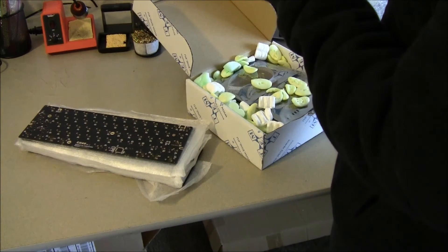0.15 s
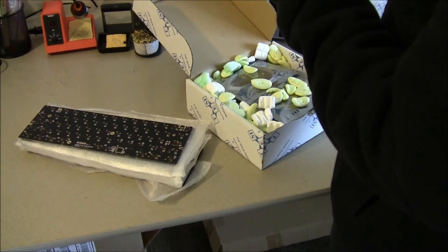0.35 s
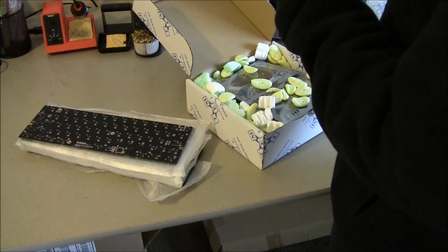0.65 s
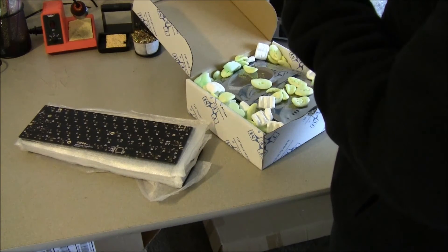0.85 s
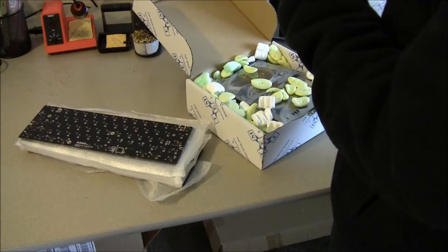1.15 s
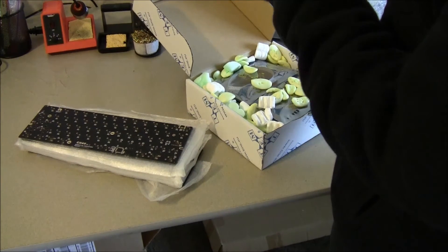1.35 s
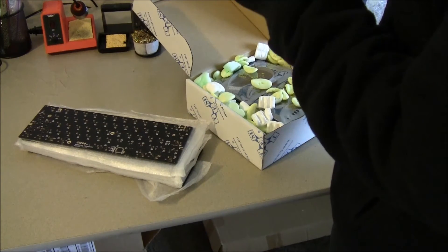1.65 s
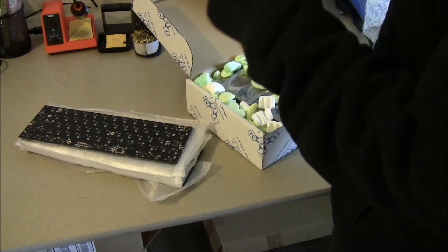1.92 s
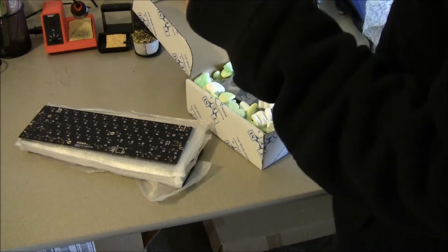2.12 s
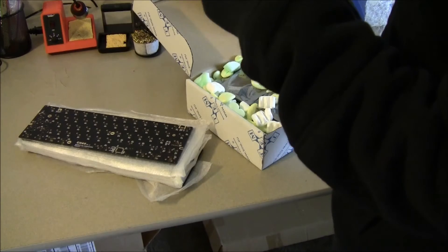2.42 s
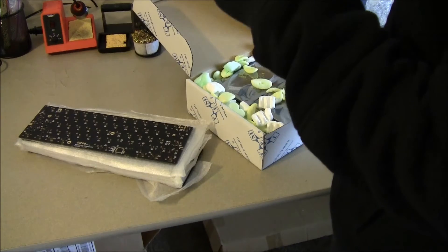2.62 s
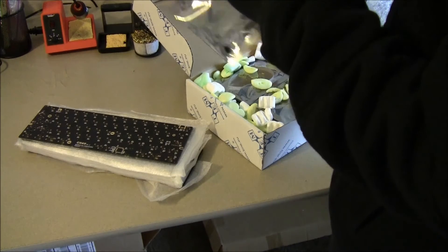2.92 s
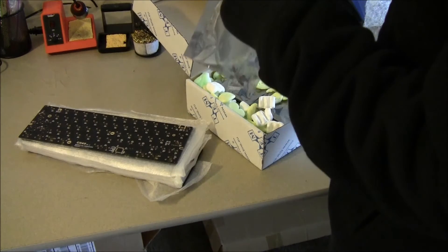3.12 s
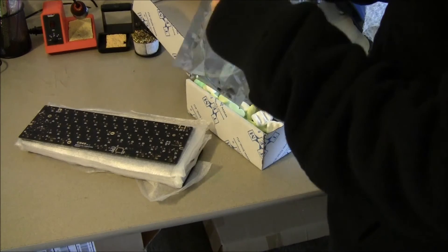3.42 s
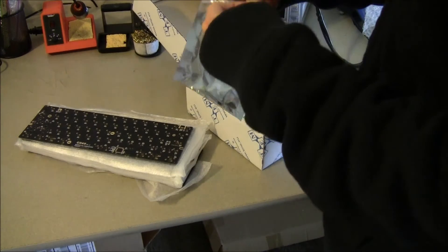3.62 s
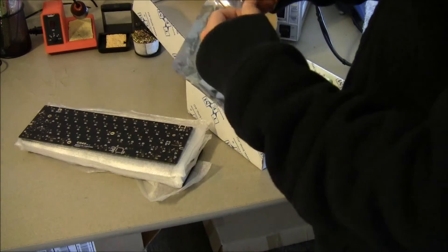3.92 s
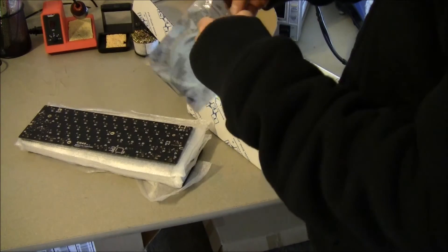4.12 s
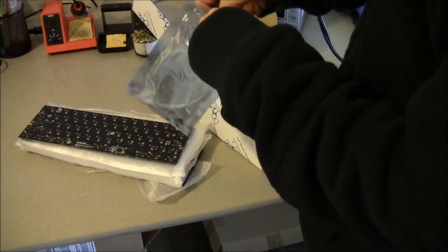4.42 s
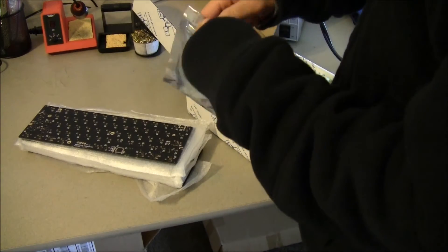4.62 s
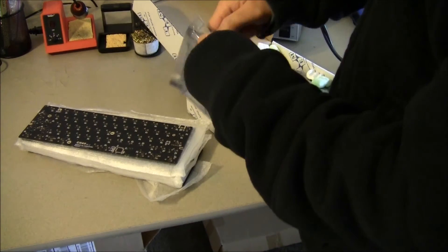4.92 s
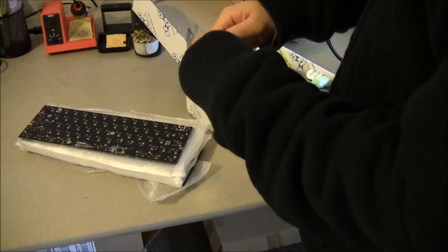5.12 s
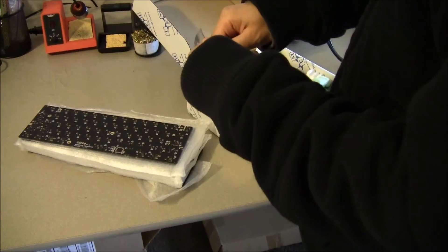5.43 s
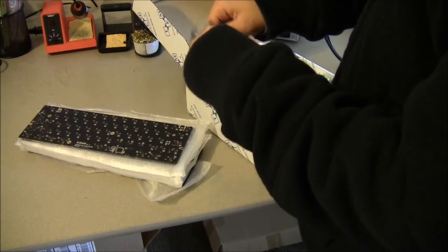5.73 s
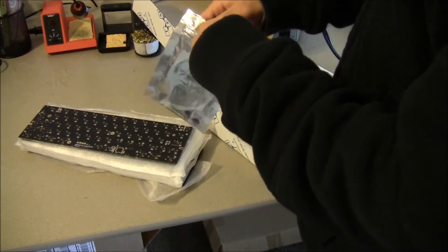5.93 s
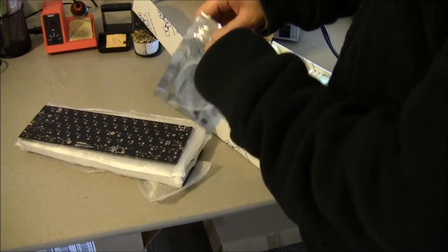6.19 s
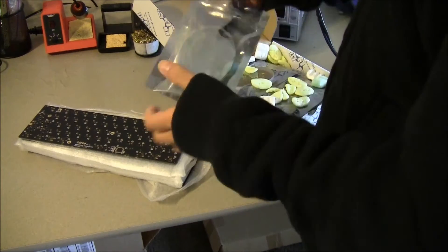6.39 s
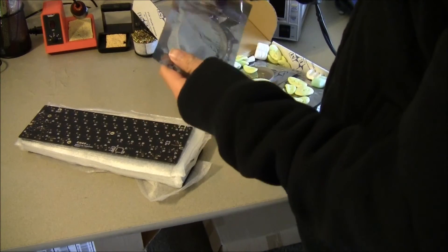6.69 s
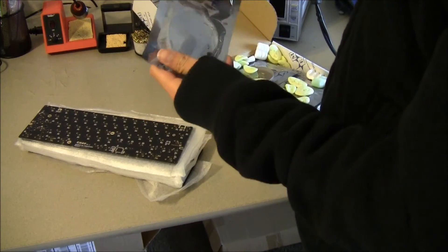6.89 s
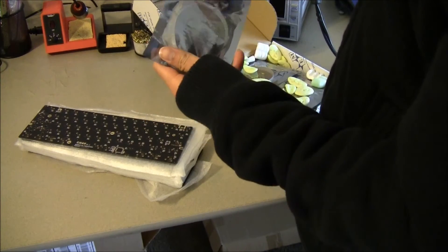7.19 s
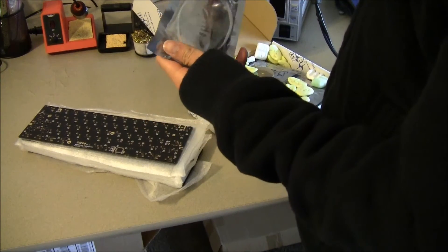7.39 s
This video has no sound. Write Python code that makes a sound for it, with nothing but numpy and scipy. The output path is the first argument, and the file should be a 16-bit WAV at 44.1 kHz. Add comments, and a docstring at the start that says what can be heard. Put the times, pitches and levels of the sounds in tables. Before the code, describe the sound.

A stiff foil bag crinkles close to the microphone, starting with scattered crisp snaps and short pauses while foam peanuts rustle faintly beneath. The handling carries on unevenly, peaks in a pair of loud cracks about two thirds through, and finishes with denser flurries of crackling. Each snap rings briefly in a small workroom, where a quiet low hum runs throughout.

```python
"""A stiff foil bag is turned in the hands over a box of foam peanuts on a bench.
Its creases flip one by one, each a sharp snap coloured by the air pocket behind the fold,
over a fine crackle of tiny creases and rubbing peanuts. The bench top throws each snap back,
a small room rings on, and the room's low hum lies under it all."""
import sys
import numpy as np
from scipy import signal
from scipy.io import wavfile
from scipy.ndimage import uniform_filter1d, minimum_filter1d

SR = 44100
rng = np.random.default_rng(int(sys.argv[2]) if len(sys.argv) > 2 else 0)


def int16_out(signal):
    """Quantize to a 16-bit WAV file."""
    q = np.round(np.clip(np.atleast_2d(signal).T, -1, 1) * 32767)
    wavfile.write(sys.argv[1], SR, q.astype(np.int16))


N = 332955


def gain_of(db):
    """Decibels to an amplitude factor."""
    return 10 ** (np.asarray(db) / 20)


def unit_rms(x):
    """The signal scaled to rms 1."""
    return x / np.sqrt(np.mean(x ** 2) + 1e-20)


def curve_at(points, hz):
    """A curve's values at hz, interpolated along log frequency."""
    point_hz, value = np.transpose(points)
    return np.interp(np.log(hz + 1), np.log(point_hz + 1), value)


def minimum_phase(db):
    """Two-sided spectra of the given colour whose responses start at once."""
    return np.exp(np.conj(signal.hilbert(np.maximum(db, -100) * np.log(10) / 20)))


# The common colour of every crease. Each row: frequency in Hz, relative level in dB.
BASE_EQ = [(50, -47.5), (150, -15), (500, -7.5), (1350, -1.5), (2210, -2.5), (3410, 0.5), (5790, -10.5),
           (10000, -17), (12500, -28.5), (16400, -61)]
# A crease's three tone controls: body, crack and sizzle frequencies in Hz.
TONE_BANDS_HZ = [900, 3200, 8500]
def creases(body_db, sizzle_db, pitch_hz, burst_s, size=1024):
    """Creases flip: a burst and a faint shiver, coloured by an air pocket; energy 1 at 1.8-5.5 kHz."""
    t, hz = np.arange(size) / SR, abs(np.fft.fftfreq(size, 1 / SR))
    noise = rng.standard_normal((len(pitch_hz), size + 1))
    flip_s = burst_s[:, None] * np.exp(.4 * noise[:, :1])
    attack = np.minimum(1.6 * t / flip_s, 1)
    decay = np.exp(-t / flip_s) + .09 * np.exp(-t / .004)
    burst = np.fft.fft(noise[:, 1:] * decay * attack)
    burst /= uniform_filter1d(abs(burst), size=11, axis=1) ** .6  # flatter, so the fold sets the pitch
    tone_db = np.array([curve_at(list(zip(TONE_BANDS_HZ, (body, 0, sizzle))), hz)
                        for body, sizzle in zip(body_db, sizzle_db)])
    bigness = 1 / (1 + (pitch_hz[:, None] / 700) ** 4)
    peak_db, width = 7.5 + 6 * bigness, .2 + .15 * bigness  # big pockets boom more and are damped more
    pocket_db = peak_db * np.exp(-(np.log((hz + 1) / pitch_hz[:, None]) / width) ** 2)
    spectra = burst * minimum_phase(curve_at(BASE_EQ, hz) + tone_db + pocket_db)
    crack_band = spectra[:, (hz > 1800) & (hz < 5500)]
    spectra /= np.sqrt((abs(crack_band) ** 2).sum(axis=1, keepdims=True) / size)
    return np.roll(np.fft.ifft(spectra).real, 16, axis=1) * signal.windows.tukey(size, 1 / 32)


# How hard the hands work the bag. Each row: time in seconds, base crackle level in dB.
CRACKLE_FADER = [(0.0, -57), (0.901, -56.5), (1.15, -49.5), (1.58, -80), (2.14, -49), (2.26, -56),
                 (2.48, -57), (2.58, -54.5), (3.17, -41.5), (3.48, -55), (3.6, -49), (4.4, -49),
                 (4.87, -51), (5.08, -41), (5.35, -49.5), (5.9, -47), (6.03, -50), (6.25, -48.5),
                 (6.74, -44), (7.17, -52), (7.35, -43)]
def crackle(per_s=1200, size_db=5.0, tone_db=4, kinds=24):
    """Countless tiny creases and rubbing peanuts, swelling as the foil settles after each snap."""
    base_db = np.interp(np.arange(N) / SR, *np.transpose(CRACKLE_FADER))
    onsets = np.zeros(N)
    onsets[(np.transpose(SNAP_CUES)[0] * SR).astype(int)] = 1
    settling = signal.oaconvolve(onsets, np.hanning(3000))[800:][:N]
    strength = gain_of(size_db * np.minimum(rng.exponential(1, N), 4))
    ticks = strength * (rng.random(N) < per_s / SR)
    kind = rng.integers(0, kinds, N)
    body, sizzle, pitch = rng.standard_normal((3, kinds))
    grains = creases(body_db=3.5 + tone_db * body, sizzle_db=.5 + tone_db * sizzle,
                     pitch_hz=2200 * np.exp(.7 * pitch), burst_s=np.full(kinds, .0006))
    rustle = sum(signal.oaconvolve(ticks * (kind == k), grain)[:N] for k, grain in enumerate(grains))
    return gain_of(base_db + 4.14 * np.minimum(settling, 3)) * unit_rms(rustle)


# The hum's colour. Each row: frequency in Hz, relative level in dB.
HUM_EQ = [(10, -10), (20, -13), (80, -3), (300, -5), (600, -7.5), (1500, -12), (5000, -22.5),
          (15000, -37.5), (16400, -51)]
# Centred lows, wide highs. Each row: frequency in Hz, left-right correlation (1 is mono).
HUM_CORRELATION = [(30, 1), (400, 0), (1400, 0.033), (15000, 0.016)]
def room_hum(level_db=-50, drift_db=2.5, drop_s=5.42, drop_db=-3, extra_rumble_db=-7):
    """Low room noise whose colour drifts; it steps down once, the rumble under 80 Hz further still."""
    frames, hz = N // 512 + 5, np.fft.rfftfreq(2048, 1 / SR)
    left_re, left_im, apart_re, apart_im, drift = rng.standard_normal((frames, len(hz), 5)).T
    drift = unit_rms(uniform_filter1d(uniform_filter1d(drift, size=14, axis=0), size=8, axis=1))
    dropped = np.clip((np.arange(frames) * 512 / SR - drop_s) / .03, 0, 1)
    step_db = dropped * (drop_db + extra_rumble_db / (1 + (hz[:, None] / 80) ** 4))
    shared = np.clip(curve_at(HUM_CORRELATION, hz), -1, 1)[:, None]
    left = left_re + 1j * left_im
    right = shared * left + np.sqrt(1 - shared ** 2) * (apart_re + 1j * apart_im)
    colour = gain_of(curve_at(HUM_EQ, hz)[:, None] + step_db + drift_db * drift)
    hum = signal.istft(np.array([left, right]) * colour, nperseg=2048, noverlap=1536)[1][:, :N]
    return gain_of(level_db) * unit_rms(hum)


# The room's decay. Each row: frequency in Hz, seconds to fall by 60 dB.
ROOM_DECAY = [(200, 0.52), (700, 0.43), (2000, 0.34), (5000, 0.34), (12000, 0.25)]
# Stereo width of the ring and the bag. Each row: frequency in Hz, relative side level in dB.
SIDE_EQ = [(60, -53), (200, 5), (700, -1), (1300, -3.5), (2400, -12.5), (4400, -1), (8000, 2.5),
           (15000, 14.5)]
def room_ring(source, tails=3, crossfades_per_s=9, early_db=12.1, side_db=-11):
    """A small room rings: crossfading tails of sparse reflections, the treble dying first."""
    ring, turn = np.zeros((2, N)), np.arange(N) / SR * crossfades_per_s
    for k in range(tails):
        taps = np.zeros((2, SR // 2))
        slots = np.arange(100, SR // 2 - 12, 12)
        arrivals = slots + rng.integers(0, 12, (2, len(slots)))
        np.put_along_axis(taps, arrivals, rng.choice([-1., 1.], arrivals.shape), axis=1)
        hz, t, bands = signal.stft(taps, SR, nperseg=256)
        bands *= gain_of(-60 * t / curve_at(ROOM_DECAY, hz)[:, None] + early_db * np.exp(-t / .0047))
        bands[1] *= gain_of(curve_at(SIDE_EQ, hz) + side_db)[:, None]
        tail = signal.istft(bands, SR, nperseg=256)[1]
        tail /= np.linalg.norm(tail[0])
        fade = np.sqrt(2 / tails) * np.cos(np.pi * (turn + k / tails))
        ring += signal.fftconvolve((source * fade)[None], tail, axes=1)[:, :N]
    mid, side = ring
    return np.array([mid + side, mid - side])


# The featured snaps. Each row: start in seconds, level in dB, body in dB, sizzle in dB,
# air-pocket pitch in Hz. Body and sizzle boost or cut the foil's colour.
SNAP_CUES = [(0.3014,-3,6.5,-3,364),(0.3477,-6,8,-2,1830),(0.4402,-3,4.5,8.5,3030),(0.5054,-3,-11,-9.5,1970),
             (0.604,-2,-3.5,-3,392),(0.6379,7.5,4,0,3530),(0.702,-2.5,-5,4,8300),(0.7263,4.5,-8,7.5,4400),
             (0.7546,-2.5,4,11,2880),(0.7877,-8,-4,-4,670),(0.8043,-6.5,-7,8,2880),(0.9087,-10,3.5,10,6300),
             (1.0158,-6,-1,-1.5,2480),(1.1489,-8.5,-6,-10.5,4300),(1.2419,-5,-2.5,-7,1210),(1.2551,7,-10,0,4800),
             (1.2752,1.5,-3,8,3000),(1.289,-4,5,0,1910),(1.3808,-6.5,-8,-2.5,1980),(1.4044,-3,-3,4,2730),
             (1.6693,0,-9,2,2600),(1.8195,0.5,3.5,-2,2450),(1.88,-5,-4,-6,1710),(1.9468,2.5,-4.5,1,9400),
             (1.9565,4,-13,5,2800),(1.9734,4,1,9.5,2850),(2.0491,-11.5,-9,2,3140),(2.124,-20,1,13.5,700),(2.1743,-13,-4,3,1370),
             (2.5147,-17,8,1,700),(2.5176,-9,-3,6,2750),(2.5415,-10.5,-7,-3,384),(2.5548,-6,-1,0.5,4540),(2.631,-14.5,-6,0,2780),
             (2.7339,-5.5,-0.5,-1.5,3430),(2.8111,2,-5,8,3750),(2.824,-6,-6,5,4180),(2.8585,3.5,5.5,1.5,2630),
             (2.8829,-5.5,-4.5,2,625),(3.0045,-1,-2,-1,3530),(3.016,3.5,-2,-1.5,1020),(3.021,-1.5,5,-11,1820),
             (3.0415,-10,2,3,2420),(3.2015,-2,3.5,14.5,4000),(3.2315,-5,-1,-3,2880),(3.252,9,-6.5,-6.5,3900),
             (3.2673,-3,3.5,13.5,860),(3.392,-8,-3,13.5,2980),(3.3958,-8.5,-4,2,4300),(3.5827,-5.5,2,7,2650),
             (3.6026,-5.5,6,7.5,6500),(3.6214,-4,-1,4,2850),(3.6325,-8.5,7,6.5,965),(3.7996,-2,-5,8,7200),
             (3.889,-3.5,8,-26,2120),(3.8942,1.5,-1.5,-0.5,1120),(4.0026,-1.5,9,0,417),(4.0966,4.5,-2.5,-5,1380),
             (4.1552,1.5,5,6,1150),(4.176,-4,-11,6,4260),(4.293,-4,1,-4,1230),(4.2961,4,-3,6,4140),
             (4.4603,0,-8.5,12.5,11300),(4.5917,-1,4.5,12.5,4860),(4.6642,-0.5,0,10.5,7460),(4.7823,-11,7,2,1980),
             (4.9123,-8.5,1.5,-4,700),(5.02,-6,8,-1,4180),(5.0362,-2,-1.5,6,4700),(5.0403,-1.5,-2,4,1300),
             (5.0939,-10.5,1,2,1290),(5.121,-4,-2,5,4030),(5.169,-3,-5,1,4100),(5.2269,2.5,-2,5,5260),
             (5.2331,-7.5,-2,3,540),(5.25,14.5,-0.5,-1,2830),(5.273,0.5,-9,0.5,2170),(5.3993,16,1.5,4.5,1350),
             (5.4346,7.5,-4.5,-14,1340),(5.508,-5,-11,11,4000),(5.512,-6,-14,2,3100),(5.572,-14.5,-19,2,5450),
             (5.639,-0.5,0.5,4,2980),(5.7915,-7,-3.5,-5,770),(5.8024,-10.5,0,-16,1130),(5.8299,-7,-2,-8,3750),
             (5.8532,-5.5,-0.5,7.5,1200),(5.857,-2.5,-5,12,5000),(5.9804,-15.5,-6,-12,1460),(6.0602,-18,-3,1,2060),
             (6.112,-8,-5,-5,1320),(6.1172,-7.5,-3,-1,1940),(6.198,-7.5,-5,1,4000),(6.2198,-1.5,6.5,3.5,3270),
             (6.265,-6.5,-0.5,-3,1040),(6.2693,-6,10,13,5140),(6.2916,-6,6,11,2700),(6.2961,-3,5,2,3570),
             (6.3404,-2.5,3.5,11.5,4500),(6.407,-0.5,2.5,4,2780),(6.4725,-6.5,-3,11,2470),(6.5072,-9.5,-3,4,593),
             (6.5799,-3.5,4,6,2150),(6.6227,-1.5,0.5,-3,4360),(6.6433,2,3,7.5,4560),(6.6651,-5.5,-1,2,1160),
             (6.682,-3,4.5,3,370),(6.7312,-2.5,5,3,3300),(6.7561,4.5,4,4,3630),(6.7614,-1,-7,12,3010),
             (6.771,2.5,-3,-6,3240),(6.7737,5.5,7.5,15,3940),(6.8043,-13,4,13,3010),(6.9582,2,0,2,540),
             (7.0755,-9,6,11,4800),(7.0854,-9,-6,7,2670),(7.1063,-13.5,7.5,15,500),(7.2282,-4.5,2,5.5,1930),
             (7.242,4.5,-4,-3,4200),(7.2923,-1.5,-2,1,3850),(7.317,10,0.5,5.5,2640),(7.3264,-1.5,-9,-1,2100),
             (7.3529,-1,-9,0,3000),(7.3597,-2.5,1.5,8,10000),(7.3944,-8.5,6,-16,1240),(7.424,0,2,-8,2900),
             (7.4447,-6,7,3.5,2040),(7.5025,-11,4.5,-23,380),(7.5204,-12,-6,5,2530)]
# The bench's slap, shifting as the bag moves: delay and its spread in seconds, level and its spread in dB.
BENCH_SLAP = (.0044, .00025, -9.5, 2.5)
def snaps():
    """Loud creases: long folds are louder and slower to flip; each returns, smeared, from the bench."""
    track = np.zeros(N + SR)
    start_s, level_db, body_db, sizzle_db, pitch_hz = np.transpose(SNAP_CUES)
    close = abs(start_s[None] - start_s[:, None]) < .035
    strong = level_db[None] > level_db[:, None] - 4
    crowd = np.minimum((close & strong).sum(axis=1) - 1, 3)  # neighbours drag and slow the flip
    cracks = creases(body_db, sizzle_db, pitch_hz, burst_s=.00045 * gain_of(.2 * level_db + 3 * crowd))
    noise = rng.standard_normal((len(start_s), 62))
    scatter = noise[:, 2:] * np.exp(-np.arange(60) / 14)  # things on the bench scatter the echo
    echoes = signal.fftconvolve(cracks, scatter, axes=1)
    echoes *= np.linalg.norm(cracks, axis=1, keepdims=True) / np.linalg.norm(echoes, axis=1, keepdims=True)
    delay_s, spread_s, slap_db, spread_db = BENCH_SLAP
    for at, db, crack, echo, (late, loud) in zip(start_s, level_db, cracks, echoes, noise[:, :2]):
        echo_s, echo_db = at + delay_s + spread_s * late, db + slap_db + spread_db * loud
        track[round(at * SR) - 30:][:len(crack)] += gain_of(db) * crack
        track[round(echo_s * SR) - 36:][:len(echo)] += gain_of(echo_db) * echo
    return track[:N]


def scene(side_db=-25, ring_db=-7, opening_db=8):
    """The bag near the centre, the room's ring around it, the hum below."""
    bag = snaps() + crackle()
    # A snap just before the start is heard only as the room's ring.
    opening = creases(body_db=[0], sizzle_db=[0], pitch_hz=np.array([3000]), burst_s=np.array([.0015]))
    opening = gain_of(opening_db) * np.pad(opening[0], (0, N))[:N]
    side_colour = minimum_phase(curve_at(SIDE_EQ, abs(np.fft.fftfreq(512, 1 / SR))))
    side_filter = np.fft.ifft(side_colour).real[:256]
    side = gain_of(side_db) * signal.oaconvolve(bag, side_filter)[:N]
    return bag + np.array([-side, side]) + gain_of(ring_db) * room_ring(bag + opening) + room_hum()


def record(dry):
    """A quick limiter holds the loudest snaps at full scale; a low-pass then trims the very top."""
    needed_gain = 1 / np.maximum(abs(dry).max(axis=0), 1)
    limiter_gain = uniform_filter1d(minimum_filter1d(needed_gain, size=89), size=89)  # 2 ms windows
    lowpass = signal.firwin(511, cutoff=16500, window=("kaiser", 9), fs=SR)
    return signal.oaconvolve(dry * limiter_gain, lowpass[None], "same")


dry = scene()
out = record(dry)
int16_out(out)
```